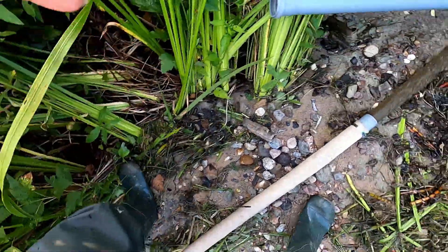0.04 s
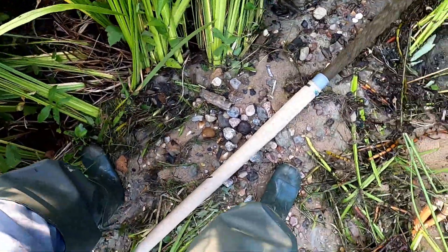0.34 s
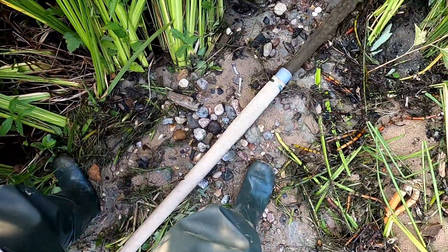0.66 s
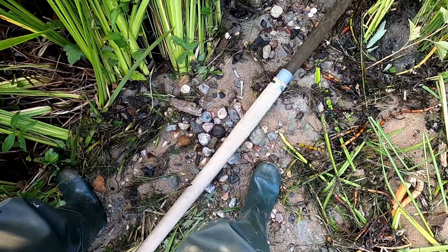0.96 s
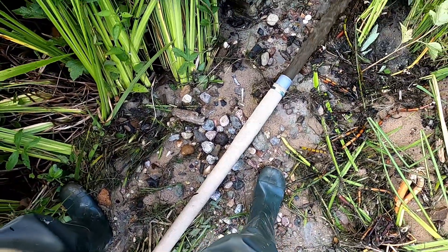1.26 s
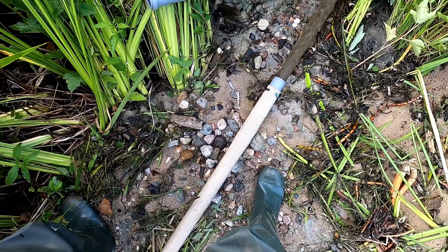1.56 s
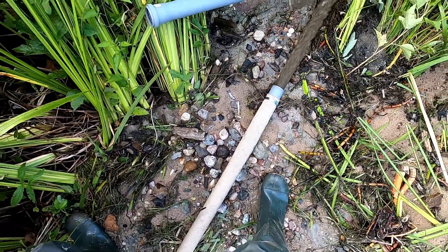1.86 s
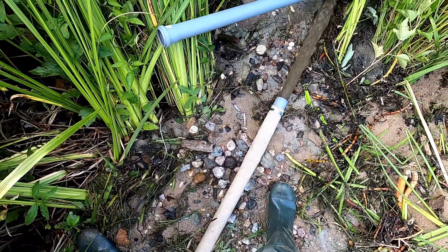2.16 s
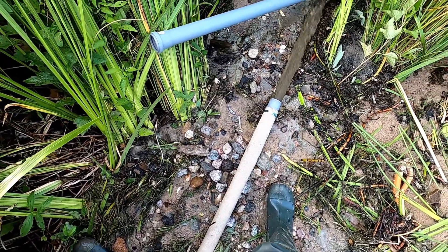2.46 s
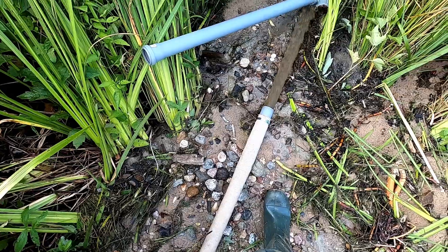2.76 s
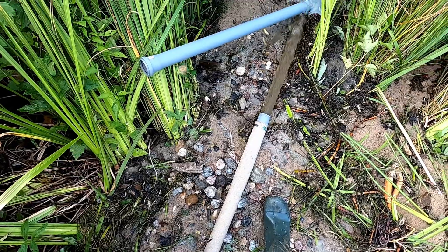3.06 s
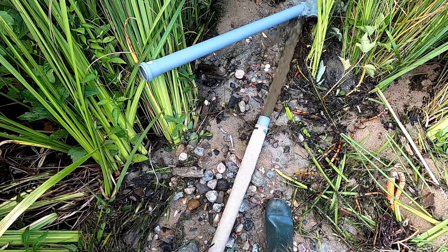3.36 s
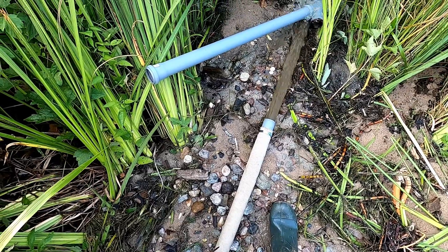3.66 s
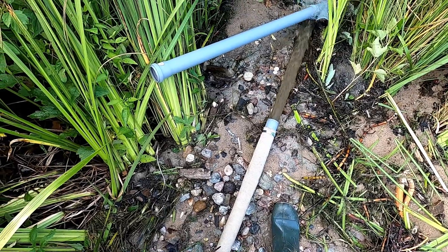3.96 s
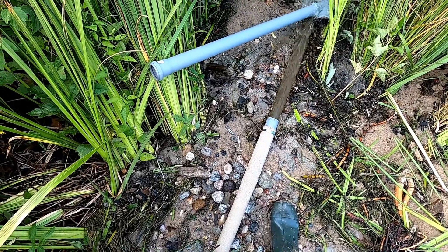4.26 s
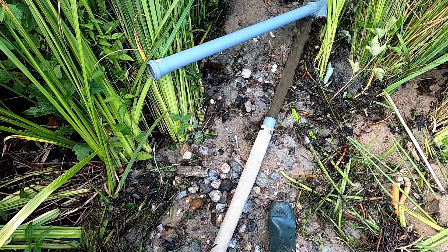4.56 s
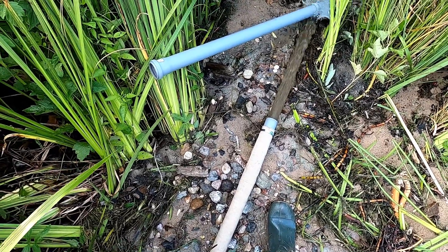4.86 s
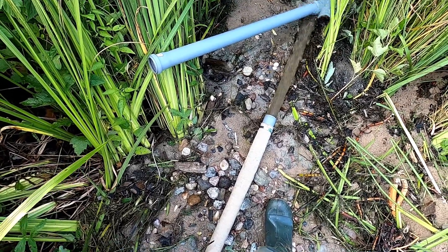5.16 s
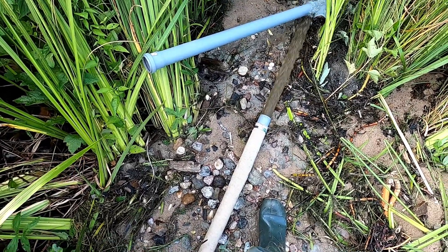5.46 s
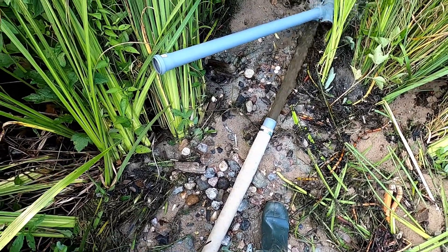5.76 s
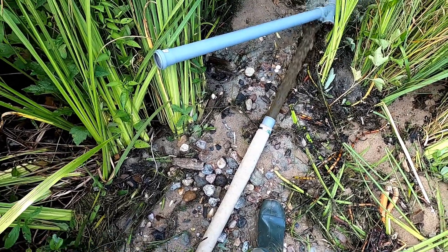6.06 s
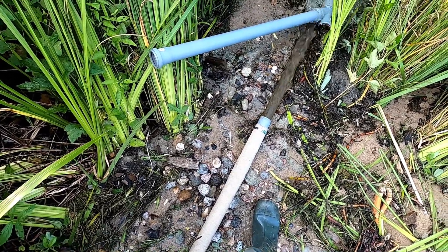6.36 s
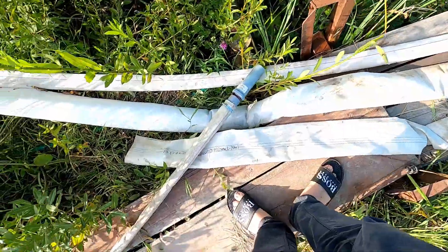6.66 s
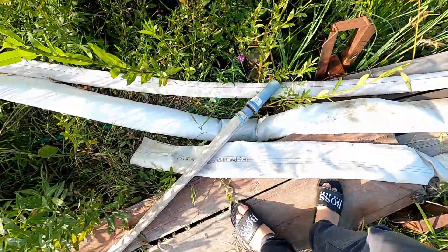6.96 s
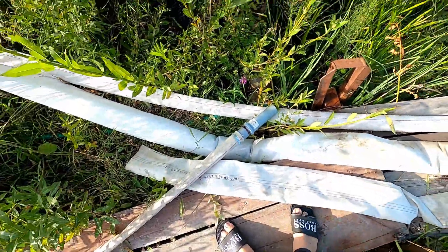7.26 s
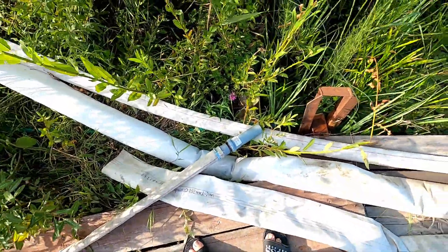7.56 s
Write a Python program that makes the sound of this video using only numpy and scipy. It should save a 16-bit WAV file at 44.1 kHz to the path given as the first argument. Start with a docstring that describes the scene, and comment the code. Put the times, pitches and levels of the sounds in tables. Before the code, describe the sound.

Water rushes steadily from a hose into pond shallows, heard from close above, gurgling and spraying with occasional splats against stones. Its tone shifts slightly as the microphone leans nearer, with faint wind buffeting. The rush stops dead near the end. Following a short gap comes a much quieter second of steps on wooden boards: soft knocks, scraping soles, snapping grit, swishing cloth and a final firm step.

```python
"""A pump-fed hose jet churns shallow, stony pond water: air pockets and spray burst in lumpy surges, with slaps
and plops on top and puffs of air on the microphone. As the listener leans in, a near reflection tints the rush.
At 6.4 s the scene changes after a short silence. Then, on a plank jetty, boards knock softly, soles scuff and
clothes rustle, up to one heavy footfall at 7.5 s."""
import sys
import numpy as np
from scipy import signal
from scipy.fft import rfft, irfft, next_fast_len
from scipy.io import wavfile
from scipy.ndimage import uniform_filter1d

SR = 44100
rng = np.random.default_rng(int(sys.argv[2]) if len(sys.argv) > 2 else 0)


def master_out(mix):
    """Clip the mix to full scale and print it as 16-bit PCM to the path in sys.argv[1]."""
    frames = np.transpose(np.atleast_2d(mix))
    ceiling = np.clip(frames, -1, 1)
    pcm = np.round(ceiling * 32767).astype(np.int16)
    wavfile.write(sys.argv[1], SR, pcm)


N = 336037
TIME = np.arange(N) / SR
JET_END_S, JETTY_START_S = 6.414, 6.68

# fader ride on the jet's rush (time [s], level [dB])
RUSH_LEVEL = [(0, -26), (.35, -24.5), (.6, -25.5), (1.5, -25), (2.1, -26), (2.6, -24.5), (4.5, -25),
              (6.4, -25)]
# big gulps of air that swell the rush (time [s], gain [dB])
AIR_GULPS = [(.235, -0.5), (.47, 2.4), (1.36, 0.5), (2.52, 1), (4.35, 2), (4.98, 0.5), (5.16, 2),
             (5.22, 0.8), (6.06, 2), (6.24, 3)]
# fine spray, the top end of the rush (time [s], gain [dB])
SPRAY_GAIN = [(0, -5), (.35, -5), (.6, 1.5), (1.9, 3.5), (2.4, 0), (4.5, 0), (6.4, 1)]
# low end of the rush (time [s], churning gain [dB], rumble gain [dB])
LOW_END_GAIN = [(.35, -7, -0.5), (.6, 1, 8.5), (1.3, 0.5, 9), (2.1, 4.5, -3), (2.4, 0.5, -6),
                (3.3, 1.5, -.5), (6.4, 0, -1)]
# tone of the rush, standing back (frequency [Hz], level [dB])
FAR_COLOUR = [(35, -59), (60, -35), (118, -28), (167, -12), (206, -4), (413, -9.5), (585, 0.5), (829, -6.5),
              (976, 2.5), (1740, -5), (2010, -4.5), (4960, -10), (9300, -28.5), (10900, -37), (15500, -46)]
# tone of the rush, leaning over it (frequency [Hz], level [dB])
CLOSE_COLOUR = [(35, -51), (60, -18.5), (150, -7), (330, -9.5), (470, -1), (800, -3.5), (1200, -4),
                (2080, -3), (3000, -4.5), (4800, -7.5), (7700, -18.5), (9500, -25.5), (10700, -35.5),
                (15500, -43.5)]
# peaks and dips close to the water (frequency [Hz], half width [Hz], gain [dB])
CLOSE_PEAKS = [(1040, 60, -2.5), (1220, 70, 1.5), (1610, 100, 2.2), (1860, 60, -2.5), (2020, 90, 1.5),
               (2430, 130, -3.5), (3050, 200, 1)]
# the listener's perspective (time [s], lean [0-1], reflection delay [ms], reflection strength [0-1])
PERSPECTIVE = [(0, 0.26, 1.15, 0.14), (.7, 0.02, 1.34, 0.08), (2.0, 0.13, 0.88, 0.17),
               (2.3, 0.49, 0.71, 0.38), (3.4, 0.79, 0.67, 0.36), (4.6, 0.87, 0.62, 0.28),
               (5.3, 0.95, 0.593, 0.32), (6.4, 0.77, 0.55, 0.3)]
# resonance of the hollow scoured by the jet (time [s], frequency [Hz], gain [dB])
HOLLOW_RESONANCE = [(0, 1080, 0), (.9, 900, 1), (1.45, 960, 5.5), (2.1, 1060, -3.5), (2.3, 490, 5),
                    (2.8, 460, 10), (4.2, 492, 2.5), (6.4, 527, 1.5)]
# water slapping the stones (time [s], level [dB], pitch [Hz])
STONE_SLAPS = [(.247, -12, 2400), (.306, -13, 1880), (.402, -16, 1070), (1.362, -14, 1300),
               (1.552, -13, 3570), (1.79, -13, 5200), (2.137, -10, 3600), (2.357, -14, 1760),
               (2.525, -8.5, 2880), (2.638, -12.5, 1580), (3.435, -16, 1650), (3.837, -13, 2330),
               (3.903, -13, 3020), (4.186, -15, 1280), (4.355, -15, 1440), (4.388, -11, 3820),
               (4.995, -4, 2210), (5.226, -14, 1660), (5.486, -10, 4800), (6.045, -15.5, 2150),
               (6.32, -16, 1610)]
# large bubbles ringing above the rush (time [s], level [dB], pitch [Hz])
BIG_BUBBLES = [(.22, -20.5, 639), (.237, -13.5, 2354), (.455, -16, 1263), (.768, -20, 1310),
               (.92, -16, 1490), (.986, -14, 4800), (3.838, -12, 3000), (4.246, -10.5, 3100),
               (4.793, -23.5, 845), (5.157, -15.5, 1220)]
# likeness of the two microphone ports (frequency [Hz], coherence [0-1])
PORT_COHERENCE = [(60, .95), (300, .99), (1200, .97), (3000, .92), (5000, .8), (7000, .66), (9000, .55),
                  (15000, .42)]
# phase between the ports (frequency [Hz], lead of the left [rad])
PORT_PHASE = [(60, 0), (1200, 0.36), (2500, -0.36), (4700, -1), (6000, -1.67), (7000, -2.2), (8000, -1.5),
              (9200, -0.5), (10500, -1.7), (12500, -3)]
# balance of the ports (frequency [Hz], left minus right [dB])
PORT_BALANCE = [(60, -1), (210, -0.5), (500, -0.5), (770, -2.5), (1790, 0.5), (2740, 0), (4190, 0),
                (6400, -1.5), (7500, -5.5), (8400, -5), (9400, 0.5), (15000, -1.5)]

# soft blows on the boards (time [s], level [dB], contact time [ms])
BOARD_KNOCKS = [(6.728, -37, 2.3), (6.733, -37, 1.7), (6.834, -34, 1.2), (6.842, -34, 1.1),
                (6.91, -44, 1.2), (7.001, -35, 1), (7.013, -39, 0.87), (7.186, -35, 4), (7.252, -35, 0.65),
                (7.37, -29, 0.71), (7.493, -24, 1.4), (7.605, -25, 4), (7.61, -31, 2.5)]
# modes of a plank (frequency [Hz], level [dB], t60 [s])
PLANK_MODES = [(176, -13.5, 0.083), (300, -1, 0.052), (407, 6, 0.04), (550, -2, 0.033), (840, -20, .03),
               (1150, -20, .02)]
# dull weight of the footfalls (time [s], level [dB], pitch [Hz], length [s])
FOOT_THUDS = [(7.068, -47, 170, .02), (7.204, -28, 75, 0.0073), (7.464, -28, 60, .025),
              (7.4932, -14, 292, 0.0058), (7.5005, -21, 146, 0.008), (7.51, -24, 30, 0.015)]
# grit and twigs snapping underfoot (time [s], level [dB], pitch [Hz])
GRIT_SNAPS = [(6.795, -47, 2500), (7.136, -31, 730), (7.256, -39, 900), (7.365, -34.5, 1010),
              (7.463, -36, 3600), (7.4912, -23, 1920), (7.493, -26, 600)]
# soles scuffing the boards (start [s], length [s], level [dB])
SOLE_SCUFFS = [(6.72, 0.061, -60), (6.838, 0.069, -50.5), (7, .02, -50), (7.065, .012, -53),
               (7.12, .025, -51), (7.191, 0.11, -50.5), (7.352, 0.083, -52), (7.461, 0.19, -38)]
# tone of a scuff (frequency [Hz], level [dB])
SCUFF_COLOUR = [(47, -50), (80, -36), (166, -6), (261, -12), (399, -5.5), (501, -9), (629, -16),
                (778, -19.5), (1210, -20.5), (1520, -30), (3000, -27), (3900, -59), (6600, -120)]
# one sole dragging (start [s], length [s], level [dB])
SOLE_DRAG = (7.065, .205, -53.5)
# hollow scrape of that drag (frequency [Hz], level [dB])
SCRAPE_COLOUR = [(300, -50), (600, -3), (790, -7), (950, -17), (1600, -40), (4000, -80)]
# trouser swishes, one a leg swing (peak time [s], half width [s], level [dB], focus [Hz])
LEG_SWISHES = [(6.755, .035, -68, 3000), (6.88, .045, -55.5, 2600), (7.013, 0.023, -54, 2200),
               (7.052, .022, -49.5, 3260), (7.24, 0.043, -59, 4000), (7.36, 0.038, -55, 4800),
               (7.48, .02, -47, 4000), (7.522, 0.03, -38.5, 4770), (7.6, 0.061, -42.5, 4500)]
# bed of rustle, building as the walker gets going (time [s], level [dB])
RUSTLE_LEVEL = [(6.68, -74), (6.8, -69), (7.0, -60), (7.62, -57)]
# tone of rubbing cloth (frequency [Hz], level [dB])
TROUSER_COLOUR = [(500, -22), (1200, 4), (1850, 2), (2100, 7), (2350, 0.5), (3400, 2), (5500, -1),
                  (7300, -6), (8500, -11), (11000, -19), (15500, -50)]

# puffs of air on the microphone (peak time [s], level [dB])
AIR_PUFFS = [(.05, -36), (.12, -45.5), (.25, -39), (.56, -49), (1.27, -53), (2.13, -44), (2.28, -46),
             (2.48, -54), (5.04, -49), (7.205, -50), (7.5, -58)]
# rumble of air on the microphone (frequency [Hz], level [dB])
WIND_COLOUR = [(8, -5), (25, -12.5), (50, -7.5), (80, -13), (150, -33), (400, -70.5)]


def jet(gulp_width_s=0.012, cutoff_s=0.0035):
    """The jet hits the pond: a churning rush with slaps and plops on top, all cut off together."""
    hz, t, z = spectra(churn())
    z = z / np.sqrt(uniform_filter1d((abs(z) ** 2).mean((0, 2)), size=5))[:, None]  # flatten before EQ
    # make-up gain: the phase between the ports thins their sum in the treble
    mono_gain = np.sqrt((1 + read(PORT_COHERENCE, hz) * np.cos(read(PORT_PHASE, hz))) / 2)
    rush = waves(ports(z * gain_of(rush_eq(hz, t)) / mono_gain, hz) * reflection(hz, t))
    gulp_db = sum(db * swell(s, gulp_width_s) for s, db in AIR_GULPS)
    rush *= gain_of(follow(RUSH_LEVEL, TIME)[0] + gulp_db) / rush.mean(0).std()
    accents = cracks(STONE_SLAPS, cycles=3.3, width=0.51, ring=1.1) + plops()
    accents = waves(ports(spectra(accents)[2], hz))
    return (rush + accents) * np.exp(-np.maximum(TIME - JET_END_S, 0) / cutoff_s)


def churn(wash_db=-3, drip_db=-9, plink_db=-12, tick_db=-14, surge_db=0.92):
    """Short bursts, ringing bubbles and ticks of spray over a wash, all surging together."""
    bursts = bubbles(density=5000, cycles=1.54, spread_db=2.5, rise=0.026, band_hz=(109.8, 9060), sizes=44)
    drips = bubbles(density=700, cycles=8.2, spread_db=3.5, rise=0.017, band_hz=(351.2, 5935), sizes=60)
    plinks = bubbles(density=160, cycles=20, spread_db=3.0, rise=0.01, band_hz=(795, 5634), sizes=70)
    mix = bursts + gain_of(drip_db) * drips + gain_of(plink_db) * plinks + gain_of(tick_db) * spray()
    mix += gain_of(wash_db) * rng.standard_normal((2, N))
    return mix * gain_of(surge_db * lumps(slow_hz=5.0, fast_hz=70))


def bubbles(density, cycles, spread_db, rise, band_hz, sizes):
    """Air pockets burst and ring with a rising pitch, even in power per Hz. Rows: direct, scattered."""
    out = np.zeros((2, N))
    for hz in np.geomspace(*band_hz, sizes):
        age = np.arange(int(5 * cycles * SR / hz) + 4) * hz / SR  # in cycles
        envelope = np.exp(-age / cycles) * (1 - np.exp(-2 * age))
        ring = envelope * np.exp(2j * np.pi * age * (1 + rise * age / cycles))
        count = int(density * TIME[-1] * (hz / 1000) ** .8 / sizes)  # small pockets are more common
        onset, chance, *phases = rng.random((8000, 4))[:count].T
        strength = gain_of(spread_db * np.minimum(-np.log(chance), 4.2))
        at = (onset[:, None] * N).astype(int) + np.arange(len(age))
        for row, phase in zip(out, phases):
            pops = ((strength * np.exp(2j * np.pi * phase))[:, None] * ring).real
            row += np.sqrt(hz) * evened(np.bincount(at.ravel(), pops.ravel(), N)[:N])
    return evened(out)


def spray(drops_per_s=500, spread_db=2.5, decay_s=0.00074):
    """Droplets land at random, each a tiny tick of noise. Rows: direct, scattered."""
    drops = (rng.random(N) < drops_per_s / SR) * gain_of(spread_db * np.minimum(rng.exponential(1, N), 5))
    power = signal.lfilter([1], [1, -np.exp(-1 / (decay_s * SR))], drops ** 2)
    return evened(np.sqrt(power) * rng.standard_normal((2, N)))


def rush_eq(hz, t, hollow_width=0.063, flicker_db=0.9):
    """Moving EQ in dB: the listener's lean, the ringing hollow, low end, spray and a slight flicker."""
    lean = follow(PERSPECTIVE, t)[0]
    hollow_hz, hollow_db = follow(HOLLOW_RESONANCE, t)
    churn_db, rumble_db = follow(LOW_END_GAIN, t)
    db = (1 - lean) * read(FAR_COLOUR, hz) + lean * read(CLOSE_COLOUR, hz)
    db += hollow_db / (1 + (np.log((hz + 1) / hollow_hz) / hollow_width) ** 2)
    db += lean * sum(gain / (1 + ((hz - centre) / width) ** 2) for centre, width, gain in CLOSE_PEAKS)
    db += churn_db / (1 + (hz / 400) ** 4) + rumble_db / (1 + (hz / 125) ** 6)
    db += follow(SPRAY_GAIN, t)[0] / (1 + (3000 / (hz + 1)) ** 2)
    patches = uniform_filter1d(rng.standard_normal(db.shape), size=24, axis=0)
    return db + flicker_db * evened(uniform_filter1d(patches, size=6, axis=1))


def reflection(hz, t, top_hz=6500, skew=0.013, port_gains=(1.02, 0.69)):
    """Comb filter of a near bounce off rough ground, which scatters away its treble."""
    _, delay_ms, strength = follow(PERSPECTIVE, t)
    delay_s = delay_ms / 1000 * (1 + skew * np.array([-1, 1]))[:, None, None]  # one path to each port
    bounce = strength * np.array(port_gains)[:, None, None] / (1 + (hz / top_hz) ** 6)
    return 1 + bounce * np.exp(-2j * np.pi * hz * delay_s)


def cracks(rows, cycles, width, ring):
    """Slaps or snaps: ragged bursts around a pitch, with some clean ring. Rows: direct, scattered."""
    out, t, hz = np.zeros((2, N)), np.arange(2048) / SR, np.fft.rfftfreq(2048, 1 / SR)
    for s, db, centre_hz in rows:
        decay_s = cycles / np.sqrt(centre_hz * 1000)  # high cracks die sooner
        band = 1 / (1 + (np.log((hz + 1) / centre_hz) / width) ** 4)
        for row in out:
            ragged = evened(irfft(band * np.exp(2j * np.pi * rng.random(len(hz)))))
            tone = np.sin(2 * np.pi * (centre_hz * t + rng.random()))
            crack = (ragged + ring * tone) * np.exp(-t / decay_s) * (1 - np.exp(-t * centre_hz)) ** 2
            add(row, s, gain_of(db) * crack / abs(crack).max())
    return out


def plops(cycles=8, rise=.01):
    """Large bubbles ring briefly and bend up a little in pitch. Rows: direct, scattered."""
    out, t = np.zeros((2, N)), np.arange(SR // 10) / SR
    for s, db, hz in BIG_BUBBLES:
        age = hz * t / cycles
        for row in out:
            ring = np.sin(2 * np.pi * (hz * t * (1 + rise * age) + rng.random()))
            add(row, s, gain_of(db) * ring * np.exp(-age) * (1 - np.exp(-2 * hz * t)))
    return out


def ports(z, hz):
    """Stereo image: direct and scattered spectra reach two microphone ports as mid and side."""
    coherence = read(PORT_COHERENCE, hz)
    pan = gain_of(read(PORT_BALANCE, hz) / 2) * np.exp(.5j * read(PORT_PHASE, hz))
    mid, side = np.sqrt((1 + coherence) / 2) * z[0], np.sqrt((1 - coherence) / 2) * z[1]
    return np.array([(mid + side) * pan, (mid - side) / pan])


def boards(attack_s=0.007):
    """Soft blows ring the planks, the weight of a step adds a low push, and grit snaps."""
    out, t = np.zeros(N), np.arange(SR // 6) / SR
    for s, db, contact_ms in BOARD_KNOCKS:
        knock = np.zeros(len(t))
        for hz, level, t60 in PLANK_MODES:
            softening = 1 + (hz * contact_ms / 1000) ** 4  # a long contact leaves high modes still
            tone = np.sin(2 * np.pi * hz * rng.uniform(0.934, 1.063) * t)
            knock += gain_of(level - 60 * t / t60) / softening * tone
        knock *= 1 - np.exp(-(t / attack_s) ** 2)
        add(out, s, gain_of(db) * knock / abs(knock).max())
    for s, db, hz, length in FOOT_THUDS:
        push = np.sin(np.pi * np.minimum(t / length, 1))
        add(out, s, -gain_of(db) * np.sin(2 * np.pi * hz * t) * push)
    return out + cracks(GRIT_SNAPS, cycles=2.5, width=0.58, ring=0.7)[0]


def shuffle(sole_floor_db=-65, grain_db=1.6, fade_in_s=0.033):
    """Soles scrape the boards and trouser cloth rubs, both in uneven grains."""
    soles = np.hypot(sum(stroke(*row) for row in SOLE_SCUFFS), gain_of(sole_floor_db))
    sound = soles * wide(SCUFF_COLOUR, side=0.01) + stroke(*SOLE_DRAG) * noise(SCRAPE_COLOUR)
    sound += sum(swish(*row) for row in LEG_SWISHES)
    sound += gain_of(follow(RUSTLE_LEVEL, TIME)[0]) * wide(TROUSER_COLOUR, side=0.033)
    grain = gain_of(grain_db * lumps(slow_hz=40.2, fast_hz=400))
    return sound * grain * np.clip((TIME - JETTY_START_S) / fade_in_s, 0, 1)


def stroke(start, length, db, attack_s=.008, release_s=0.032):
    """Pressure of a sliding sole: attack, hold, release."""
    age = TIME - start
    return gain_of(db) * np.clip(age / attack_s, 0, 1) * np.exp(-np.maximum(age - length, 0) / release_s)


def swish(s, width, db, focus_hz, cut_db=11.5):
    """One swing of a leg: a swell of cloth noise, cut back on either side of its focus."""
    colour = [(hz, level - cut_db * min(np.log2(hz / focus_hz) ** 2, 1)) for hz, level in TROUSER_COLOUR]
    return gain_of(db) * swell(s, width) * wide(colour, side=0.033)


def wind(pond_db=-65.5, jetty_db=-71, waver_db=2.5, rise_s=.018, ebb_s=.075):
    """Air buffets the microphone in both places: a wavering breeze and quick puffs that ebb slowly."""
    puffs = sum(gain_of(db) * np.exp(-np.maximum((s - TIME) / rise_s, (TIME - s) / ebb_s))
                for s, db in AIR_PUFFS)
    by_pond = np.clip((JET_END_S - TIME) / 0.0095, 0, 1)
    on_jetty = np.clip((TIME - JETTY_START_S) / .05, 0, 1)
    breeze_db = np.where(TIME < JETTY_START_S, pond_db, jetty_db)
    breeze = gain_of(breeze_db + waver_db * lumps(slow_hz=1.5, fast_hz=8))
    return wide(WIND_COLOUR, side=.3) * (by_pond + on_jetty) * np.hypot(puffs, breeze)


def lumps(slow_hz, fast_hz):
    """Turbulent modulation of rms 1 between two rates."""
    hz = np.fft.rfftfreq(N // 32 + 2, 32 / SR)
    shape = hz / (hz + slow_hz) / np.sqrt(hz + slow_hz) / (1 + (hz / fast_hz) ** 2)
    slow = evened(irfft(shape * (rng.standard_normal((len(hz), 2)) @ [1, 1j])))
    return np.interp(np.arange(N) / 32, np.arange(len(slow)), slow)


def noise(colour):
    """Noise of rms 1 with the given spectrum."""
    size = next_fast_len(N, real=True)
    eq = gain_of(read(colour, np.fft.rfftfreq(size, 1 / SR)))
    return evened(irfft(rfft(rng.standard_normal(size)) * eq, size)[:N])


def wide(colour, side):
    """Stereo noise: a mid signal plus a share of side."""
    return noise(colour) + side * np.array([[1], [-1]]) * noise(colour)


def swell(s, width):
    """A smooth rise and fall of height 1 around s seconds."""
    return np.exp(-np.minimum(((TIME - s) / width) ** 2, 60))


def spectra(x):
    """Short-time spectra: Hz as a column, frame times, values."""
    hz, t, z = signal.stft(x, SR, nperseg=1024, noverlap=768)
    return hz[:, None], t, z


def waves(z):
    """Short-time spectra back to sound."""
    return signal.istft(z, nperseg=1024, noverlap=768)[1][:, :N]


def read(points, hz):
    """A curve over log frequency, read at hz."""
    f, value = np.transpose(points)
    return np.interp(np.log(hz + 1), np.log(f + 1), value)


def follow(rows, t):
    """Every column of an automation curve at the times t."""
    s, *columns = np.transpose(rows)
    return [np.interp(t, s, c) for c in columns]


def add(mix, s, sound):
    """Mixes a sound in at s seconds."""
    part = mix[round(s * SR):][:len(sound)]
    part += sound[:len(part)]


def gain_of(db):
    """Decibels to a factor."""
    return 10 ** (np.asarray(db) / 20)


def evened(x):
    """Scales to rms 1."""
    return x / np.sqrt(np.mean(x ** 2) + 1e-20)


def scene():
    """The jet, then the jetty, with light wind under both."""
    return jet() + wind() + shuffle() + boards()


def record(dry, limit_db=-8, attack_s=0.00076, recover_db_per_s=55, top_hz=15800):
    """A limiter ducks for a moment after the hardest peaks; a low-pass trims the very top."""
    over_db = np.maximum(20 * np.log10(abs(dry).max(0) + 1e-9) - limit_db, 0)
    recovery_db = TIME * recover_db_per_s
    duck_db = np.maximum.accumulate(over_db + recovery_db) - recovery_db
    lag = np.exp(-1 / (attack_s * SR))  # the first peak slips through
    limited = dry / gain_of(signal.lfilter([1 - lag], [1, -lag], duck_db))
    low_pass = signal.firwin(511, top_hz, window=("kaiser", 9), fs=SR)
    return signal.oaconvolve(limited, low_pass[None], "same")


dry = scene()
out = record(dry)
master_out(out)
```